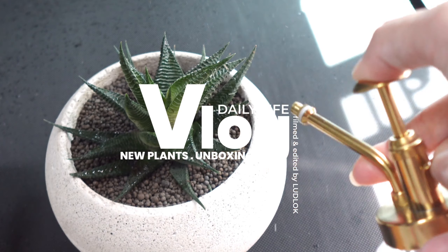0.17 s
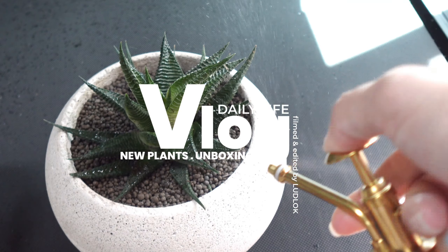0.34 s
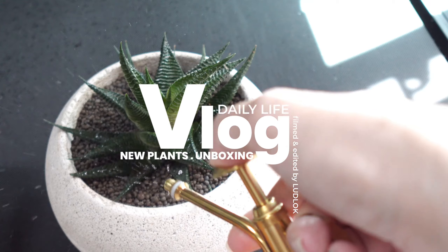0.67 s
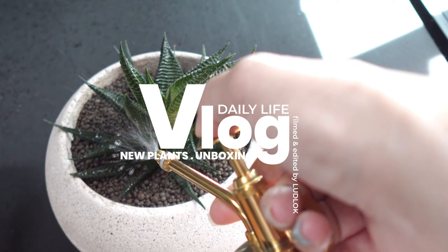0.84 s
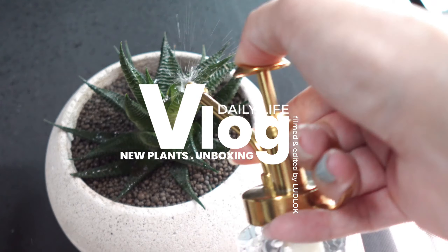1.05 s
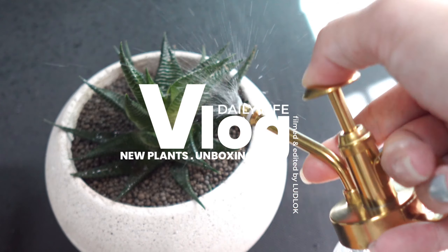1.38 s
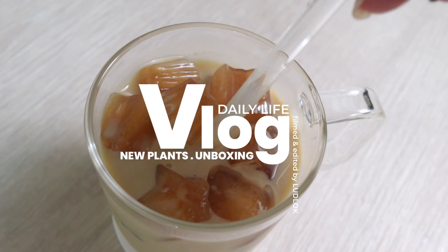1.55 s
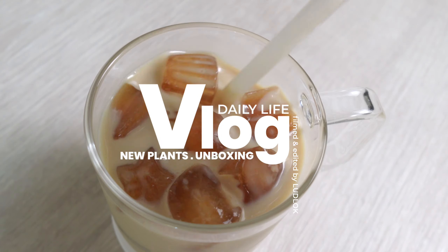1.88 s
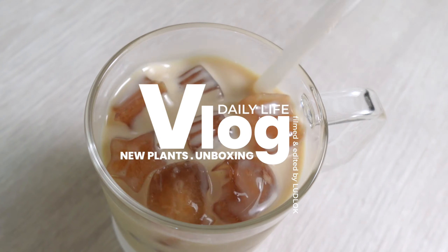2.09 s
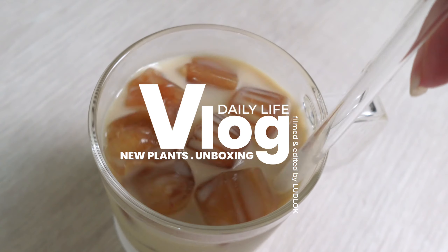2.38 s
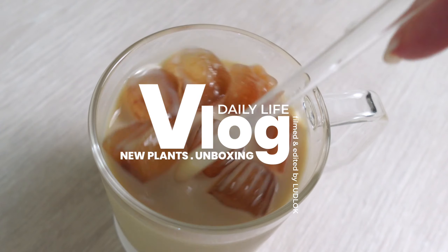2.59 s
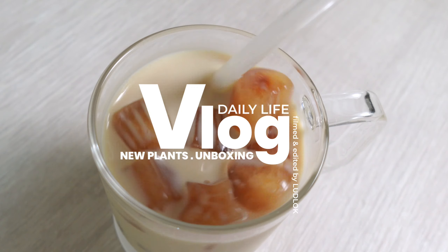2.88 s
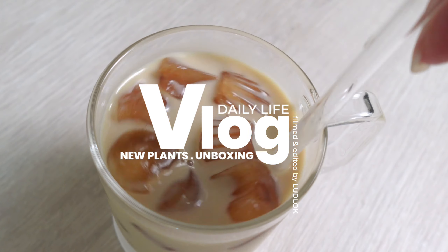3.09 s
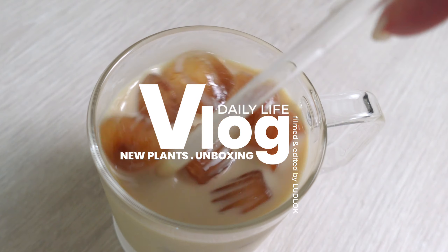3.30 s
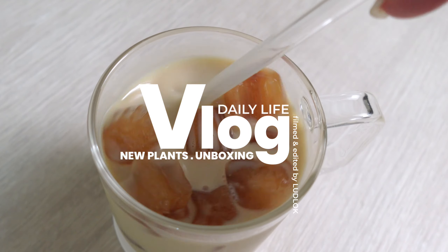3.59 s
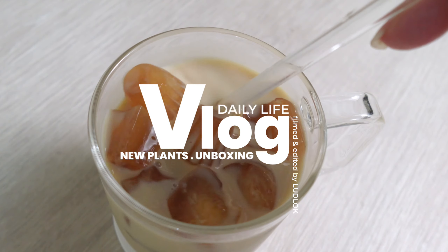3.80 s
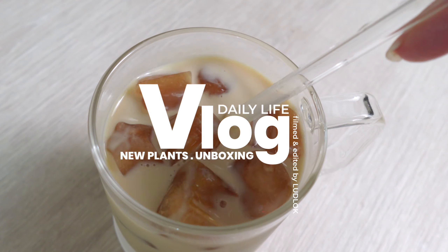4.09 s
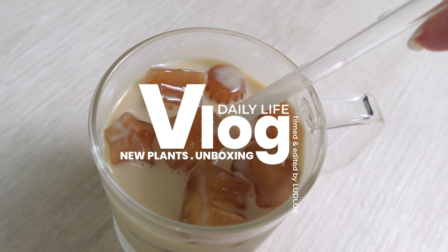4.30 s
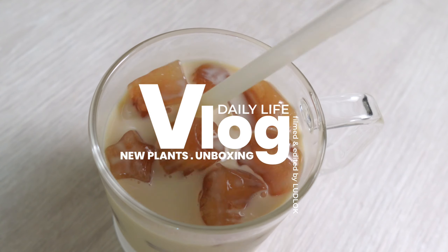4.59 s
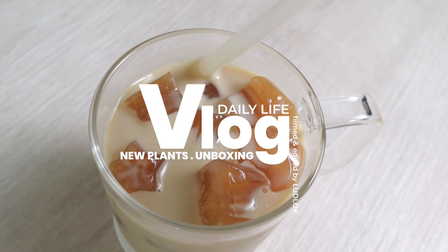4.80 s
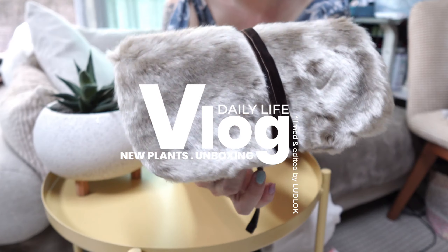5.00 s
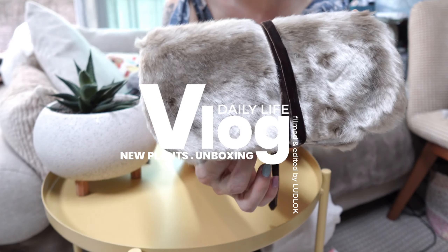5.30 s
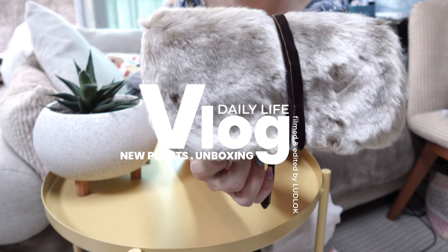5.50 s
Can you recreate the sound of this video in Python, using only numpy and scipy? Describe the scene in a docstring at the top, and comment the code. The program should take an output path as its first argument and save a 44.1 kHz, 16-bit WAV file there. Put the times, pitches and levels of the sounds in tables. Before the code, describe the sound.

Starting abruptly, a metal plant sprayer is pumped quickly: plunger knock, bright spit, fine mist, springy return, repeated about every third of a second. A hard cut brings damped, bright ice clinks against a mug, flurried then sparser, over watery swirl and tiny ticks. The last second is slightly fuller room air with barely audible gliding squeaks, stopping without a long fade. Close stereo microphone, small dry room.

```python
"""Three short indoor scenes; the first opens at full level and the last stops without a fade.
A brass plant mister sprays six times: noise knocks for the plunger, shaped noise for the mist, struck modes for the brass.
A straw stirs iced coffee: cubes clink as damped glass modes, ticks and noise make the rubbing and swirl,
and dying tones make the bubbles. Last, a furry bag: only room tone and a few faint, thin squeaks of gliding narrow noise."""
import sys
import numpy as np
from scipy import signal
from scipy.fft import rfft, irfft, next_fast_len
from scipy.io import wavfile
from scipy.ndimage import map_coordinates

SR = 44100
rng = np.random.default_rng(int(sys.argv[2]) if len(sys.argv) > 2 else 0)


def generate_wav(signal):
    """Clip the signal to [-1, 1] and save it as 16-bit WAV at the path in sys.argv[1]."""
    frames = np.transpose(np.atleast_2d(signal))
    scaled = np.clip(frames, -1, 1) * 32767
    pcm = np.round(scaled).astype(np.int16)
    wavfile.write(sys.argv[1], SR, pcm)


N = 249158

# colour of a knock on the mister: freq_hz, level_db
KNOCK_SPECTRUM = [(300, -29), (900, -9.5), (1500, -2), (2500, -2.5), (4200, -2), (6500, -3.5), (8500, -5.5),
                  (12000, -7), (16000, -15.5)]
# how briskly the straw stirs: time_s, vigour_db
STIR_VIGOUR = [(1.65, -7.5), (1.92, 6.5), (2.1, -4.5), (2.24, 14.5), (2.37, 5.5), (2.46, 4.5), (2.62, -3),
               (2.73, 4.5), (2.82, 1), (2.95, 4), (3.16, -3), (3.38, -7.5), (3.62, 0), (3.74, 3),
               (3.96, 7.5), (4.1, -4.5), (4.46, -8.5), (4.63, 2), (4.8, -9.5)]
# usual left-right likeness of noise: freq_hz, likeness (0 to 1)
ALIKE = [(25, 0.33), (100, 0.94), (1000, 0.94), (14000, 1)]


def amp(db):
    """Decibels to gain."""
    return 10 ** (np.asarray(db) / 20)


def unit(x):
    """Scale to rms 1."""
    return x / np.sqrt(np.mean(x ** 2) + 1e-20)


def blow(x):
    """Scale a hit to the energy of one millisecond at level 1."""
    return x / np.sqrt(np.sum(x ** 2) * 1000 / SR + 1e-20)


def along(points, hz):
    """Read (Hz, value) points on a log axis."""
    f, v = np.transpose(points)
    return np.interp(np.log(hz + 1), np.log(f + 1), v)


def curves(rows):
    """One value per sample for each column after the time."""
    s, *cols = np.transpose(rows)
    return [np.interp(np.arange(N) / SR, s, c) for c in cols]


def wobble(rate):
    """A smooth random curve, rate knots a second."""
    knots = rng.standard_normal(int(N * rate / SR) + 4)
    return map_coordinates(knots, [np.arange(N) * rate / SR])


def filtered(x, response):
    """x times a response of frequency."""
    m = next_fast_len(x.shape[-1] + 8192, True)
    spectrum = rfft(x, m) * response(np.fft.rfftfreq(m, 1 / SR))
    return irfft(spectrum, m)[..., :x.shape[-1]]


def coloured(hit, points):
    """Causal (minimum-phase) colouring of a short hit by (Hz, dB) points."""
    m = 2 * len(hit)
    cepstrum = irfft(np.log(amp(along(points, np.fft.rfftfreq(m, 1 / SR)))))
    cepstrum[1:m // 2] *= 2
    cepstrum[m // 2 + 1:] = 0
    return irfft(rfft(hit, m) * np.exp(rfft(cepstrum)))[:len(hit)]


def decay(t60, size=8192):
    """A level that falls 60 dB in t60 seconds."""
    return np.exp(-np.log(1000) * np.arange(size) / SR / max(t60, 1 / SR))


def burst(t60, size=8192):
    """A dying puff of noise."""
    return blow(rng.standard_normal(size) * decay(t60, size))


def ring(modes, length=1, scatter_db=2, detune=0, size=8192):
    """Damped modes, struck with new strengths, signs and detunings each time."""
    t = np.arange(size) / SR
    total = np.zeros(size)
    for hz, db, t60 in modes:
        strength, shift, sign = rng.standard_normal(3)
        tone = np.sin(2 * np.pi * hz * (1 + detune * shift) * t)
        total += np.sign(sign) * amp(db + scatter_db * strength) * decay(t60 * length, size) * tone
    return blow(total)


def add(track, s, sound):
    """Mix a sound into a track at s seconds, or at the start if s is negative."""
    part = track[max(round(s * SR), 0):][:len(sound)]
    part += sound[:len(part)]


def rush(spectrum, alike=ALIKE):
    """Partly correlated stereo noise of rms 1, from shared mid and opposed side noise."""
    def response(hz):
        turn = np.arccos(np.clip(along(alike, hz), -1, 1)) / 2
        return amp(along(spectrum, hz)) * [np.cos(turn), np.sin(turn)]
    mid, side = filtered(rng.standard_normal((2, N)), response)
    return unit(np.array([mid + side, mid - side]))


def narrow(centre_hz, width_hz):
    """Noise in one resonance, whose centre may move."""
    slow = filtered(rng.standard_normal((2, N)), lambda hz: 1 / (1 + (hz / width_hz) ** 2))
    phase = 2 * np.pi * np.cumsum(centre_hz * np.ones(N)) / SR
    return unit(slow[0] * np.cos(phase) + slow[1] * np.sin(phase))


def grains(rate, spread_db):
    """Random tiny impulses of uneven size, about rate a second, rms 1."""
    size = amp(spread_db * np.minimum(rng.exponential(size=N), 2)) * rng.choice([-1, 1], N)
    return unit(size * (rng.random(N) < rate / SR))


def in_room(x, wet_db, pan_db, gap=0.0011):
    """The direct sound and a diffuse noise tail, most of it shared by both channels."""
    # reverberation: freq_hz, t60_s
    room = [(200, 0.75), (2000, 0.26), (7000, 0.12), (15000, 0.37)]
    hz, t, z = signal.stft(rng.standard_normal((2, SR // 2)), SR, nperseg=256)
    fade = np.exp(-np.log(1000) * t / along(room, hz)[:, None])
    mid, side = signal.istft(z * fade, SR, nperseg=256)[1]
    onset = 1 - np.exp(-np.arange(len(mid)) / SR / gap)
    tail = np.array([mid + 0.2 * side, mid - 0.12 * side]) * onset
    wet = signal.fftconvolve(x[None], tail / np.linalg.norm(tail[0]), axes=1)[:, :N]
    return x * amp([[pan_db / 2], [-pan_db / 2]]) + amp(wet_db) * wet


def mister():
    """Each stroke: touch, press, spit and mist, the valve shuts, release, and the spring rings the brass."""
    # the thumb lets go and the plunger knocks loose: time_s, level_db, treble_db
    releases = [(0.1443, -18, 1), (0.4492, -19.5, 4), (0.7446, -15.5, -5), (1.0103, -18.5, 1),
                (1.2738, -17.5, 4.5)]
    # the spring throws the plunger back, the hand damps the brass: time_s, level_db, ring_length_factor, low_modes_db
    returns = [(.169, -24.5, 0.76, -3), (.485, -32, 1, 9), (0.77, -36, .74, 3), (1.033, -22.5, 0.77, -5),
               (1.299, -21, 0.61, -1)]
    # the thumb takes up the slack, then pushes: time_s, level_db, first_touch_lead_s
    presses = [(0.2646, -19, 0.02), (0.5637, -25.5, 0.021), (.841, -19.5, 0.0082), (1.0988, -18.5, 0.0078),
               (1.3957, -19.5, 0.011)]
    # the valve shuts after a spray: time_s, level_db
    valve = [(0.0466, -22), (0.34, -25.5), (0.5972, -24), (0.9292, -27), (1.185, -21.5)]
    # each push spits, then sprays: time_s, spit_db, spray_s, hiss_db
    puffs = [(-.024, -24, .15, -43.5), (0.2865, -17.5, .155, -45.5), (.5957, -23.5, 0.13, -44),
             (0.8627, -20, .12, -48), (1.1228, -12, 0.13, -48), (1.421, -21.5, .39, -46.5)]
    # brass body modes before hand damping: freq_hz, level_db, t60_s
    brass = [(1445, -7, 0.097), (3306, -13, 0.52), (5356, -12, 0.072), (6150, -7, 0.14), (6955, -13, .11),
             (7260, 2, 0.13), (7520, -5, 0.065), (8860, -12, 0.18), (14180, -19, .06)]
    # nozzle modes: freq_hz, level_db, t60_s
    nozzle = [(6050, 1, 0.06), (6440, -13, 0.046), (6860, 2, 0.039), (9740, 1, 0.02), (10400, 2, 0.02),
              (11700, 0, 0.023), (12800, -5, 0.025)]
    # mist: freq_hz, level_db
    spray = [(300, -8), (1400, -3.5), (3000, 0.5), (6500, 0.5), (8000, 1.5), (13000, -1.5), (16000, -0.5)]
    rebound_s, rebound_db = 0.011, -8  # it knocks once more, duller
    touch_db, return_knock_db = -5, -23
    hiss_lead_s = 0.0032  # mist escapes just before the spit
    sputter_db, sputter_treble_db = -8, 5  # air sputters ahead of the water
    usual_spit_db, treble_per_spit_db = -18.5, 0.82  # stronger spits are brighter

    metal, flow = np.zeros(N), np.zeros(N)
    for s, db, treble_db in releases:
        add(metal, s + 0.000775, amp(db) * knock("release", treble_db))
        add(metal, s + rebound_s, amp(db + rebound_db) * knock("rebound"))
    for s, db, length, low_db in returns:
        held = [(hz, level + low_db * (hz < 4000), t60) for hz, level, t60 in brass]
        ringing = amp(db - 0.5) * ring(held, length=length, scatter_db=5.0)
        add(metal, s + 0.00078, ringing + amp(return_knock_db) * knock("return"))
    for s, db, lead in presses:
        add(metal, s - lead, amp(db + touch_db) * knock("touch"))
        add(metal, s + .0008, amp(db) * knock("press"))
    for s, db in valve:
        puff = blow(coloured(burst(0.046), KNOCK_SPECTRUM))
        add(metal, s + 0.0011, amp(db - 4) * (ring(nozzle, detune=0.0098) + amp(-19) * puff))
    for s, spit_db, length, hiss_db in puffs:
        treble_db = treble_per_spit_db * (spit_db - usual_spit_db)
        add(metal, s + .0008, amp(spit_db) * knock("spit", treble_db))
        add(metal, s - hiss_lead_s, amp(spit_db + sputter_db) * knock("spit", sputter_treble_db))
        # the pressure rises fast, then sags as the plunger bottoms out
        stroke = (np.arange(N) / SR - s + hiss_lead_s) / length
        flow += amp(hiss_db) * np.clip(stroke / 0.056, 0, 1) * (1 - np.clip(stroke, 0, 1) ** 4)
    mist = flow * amp(1.1 * wobble(61.5)) * rush(spray)
    return in_room(metal, wet_db=-12.5, pan_db=-2.0) + mist


def knock(kind, treble_db=0):
    """A dry knock of the plunger in the barrel: coloured noise over hand-damped brass modes."""
    # kinds of knock: low_band_db, high_band_db, t60_s
    kinds = {"release": (-6, -1.5, 0.036), "rebound": (7.3, -26, 0.065), "return": (-7, -4, 0.031),
             "touch": (-23, -32, 0.047), "press": (-5.5, -23, 0.036), "spit": (-2.9, -0.71, 0.034)}
    # brass modes that every knock wakes: freq_hz, level_db, t60_s
    barrel = [(1440, -7, 0.23), (3380, -3, 0.22), (7230, 0.5, 0.15)]
    low_db, high_db, t60 = kinds[kind]
    hit = coloured(blow(burst(0.0021) + amp(8.0) * burst(t60)), KNOCK_SPECTRUM)
    hit = coloured(hit, [(1800, low_db), (4500, 0), (7000, 0), (11000, high_db + treble_db)])
    return amp(-5.5) * blow(hit) + amp(-19) * ring(barrel, scatter_db=2.0)


def clinks():
    """Cubes strike the mug and the rim sings on; returns what both ports share and where they differ."""
    # a cube hits the mug: time_s, level_db, hardness_db (as treble)
    ice = [(1.6388, -14.5, -6), (1.7439, -21.5, 4), (1.8283, -14, -9), (1.8489, -14.5, 4), (1.9003, -1, -7),
           (1.9735, -1.5, 7), (2.0046, -3.5, 7), (2.0175, -5, 8.5), (2.091, -17, 6), (2.1102, -17.5, 2),
           (2.1393, -6, -1.5), (2.144, -11, 0), (2.1539, -14, -1), (2.1836, -1, 4), (2.2042, -3, -3.5),
           (2.2338, -9.5, -4), (2.2535, -16, -11), (2.2752, -2, 4.5), (2.3117, -9, -5), (2.376, -21, -15.5),
           (2.406, -18, -12.5), (2.4339, -3, -8), (2.46, -3.5, 9), (2.4737, -11, -1), (2.4768, 0.5, 3.5),
           (2.4994, -10, -4), (2.5425, -14.5, -3), (2.5557, -11.5, -4), (2.6259, -12.5, -8.5),
           (2.6657, -21, -13), (2.7104, -15.5, -20), (2.8888, -20, -11), (2.8958, -16.5, -14),
           (2.9172, -18, -2), (2.937, -2.5, 6.5), (3.0278, -5.5, 3), (3.052, -16, -12), (3.2142, -11, -12),
           (3.238, -11.5, 1), (3.45, -19.5, -10), (3.5508, -18.5, -15), (3.6816, -3.5, -0.5),
           (3.731, -10, -6.5), (3.7375, -2.5, -10), (3.7617, -10, -3.5), (3.7916, -15.5, -4),
           (3.812, -15, -4), (3.8668, -3.5, -2), (3.885, -18, -3), (3.9026, -7.5, -9), (3.944, -12, -1.5),
           (3.953, -16.5, -7), (3.9815, -14.5, -5), (4.0054, -21.5, 0), (4.203, -26.5, -10),
           (4.5433, -16, -3.5), (4.5593, -15, -2), (4.6054, -5, -11), (4.619, -12, -13.5),
           (4.648, -13.5, -2.5), (4.671, -5, -4), (4.7066, -6.5, -3.5), (4.775, -8, 6), (4.792, -9.5, 2.5)]
    # drink height on the wall shifts the main mode and damps the low ones: time_s, main_mode_hz, low_modes_db
    slosh = [(1.9, 6330, 4.5), (1.975, 6560, -7), (2.14, 6540, 4), (2.25, 6090, -3.5), (2.9, 6230, 2),
             (3.2, 6070, -3), (3.7, 6215, -6), (4.6, 6220, 5), (4.67, 6710, 6.5), (4.78, 6680, -2.5)]
    # the dry rim: freq_hz, level_db, t60_s
    rim = [(2160, -5, 0.2), (4436, 4.5, 0.14), (6350, 2.5, .17), (6700, -9.5, 0.089), (8050, 2.5, 0.1),
           (9640, -5.5, 0.12), (10200, -2, 0.11), (13700, -5.5, .14)]
    # the small wall radiates little bass: freq_hz, level_db
    body_cut = [(150, -5.5), (1300, -4)]
    mug_hz = 6400  # main mode at pitch factor 1
    base_blunt_db, blunt_per_db, blunt_per_hardness = -8.5, 0.75, 0.15
    base_rim_db, rim_per_hardness, rim_db_per_hz = -21, 0.9, 0.0208  # freer rim as the drink sinks
    chatter_db, chatter_per_hardness, chatter_db_per_s = -12, 0.32, 748.5  # blunt contacts skid more
    hit_pan_db = 0.54  # cubes strike around the wall

    glass, side = np.zeros(N), np.zeros(N)
    when, main_hz, low_db = np.transpose(slosh)
    for s, db, hard_db in ice + nudges(count=24):
        pitch = np.interp(s, when, main_hz) / mug_hz
        free_db = np.interp(s, when, low_db)
        # hard contacts are bright; weak, blunt ones favour the low modes
        blunt_db = base_blunt_db + free_db - blunt_per_db * db - blunt_per_hardness * hard_db
        colour = body_cut + [(2100, blunt_db + 3.0), (2800, blunt_db), (3800, 0), (6800, 0), (9000, hard_db)]

        def strike():
            return amp(db - 5.0) * blow(coloured(contact(pitch), colour))

        hit, start = strike(), s + .0007
        add(glass, start, hit)
        rim_db = base_rim_db + rim_per_hardness * hard_db + rim_db_per_hz * mug_hz * (pitch - 1)
        add(glass, start, amp(db + rim_db) * ring(rim, scatter_db=1.5, detune=0.0023))
        # the wall radiates each mode unevenly toward the two ports
        pan = amp(hit_pan_db * rng.standard_normal() / 2) - 1
        add(side, start, amp(-23.0) * strike() + pan * hit)
        # the wet cube skids and touches again, later touches lighter
        skid = strike()
        for lag in rng.uniform(.002, .016, size=4):
            skid_db = chatter_db - chatter_per_hardness * hard_db - chatter_db_per_s * lag
            add(glass, start + lag, amp(skid_db) * skid)
    return glass, side


def contact(pitch):
    """One touch of ice on glass: a crack, and wall modes that the drink damps within milliseconds."""
    # filled mug before pitch shift and shortening: freq_hz, level_db, t60_s
    mug = [(2095, -10.5, 0.029), (2388, -6, 0.02), (2625, -7.5, 0.043), (3246, -2, 0.012),
           (4115, -1.5, 0.025), (4440, 2, 0.017), (5390, -10.5, 0.032), (6320, 0.5, 0.018),
           (6700, 0, 0.015), (8400, -3, 0.013), (10075, -0.5, 0.017), (11660, -13.5, 0.012),
           (13140, -2, 0.0073), (14900, -28, .012)]
    # the instant of contact: freq_hz, level_db
    crack_spectrum = [(40, -58), (300, -27.5), (1400, -7.5), (2500, 4), (5000, 7.5), (10000, -6.5),
                      (16000, -15)]
    modes = [(hz * pitch if hz > 3000 else hz, db, t60) for hz, db, t60 in mug]  # the lowest keep their pitch
    wall = ring(modes, length=0.77, scatter_db=3.5, detune=0.02, size=4096)
    crack = blow(coloured(burst(0.0069, size=4096), crack_spectrum))
    return blow(wall + amp(-8.0) * crack)


def nudges(count):
    """Light contacts at chance moments, stronger with brisk stirring: time_s, level_db, hardness_db."""
    # span of the light contacts: start_s, end_s
    start, end = (1.85, 4.8)
    base_db, db_per_vigour_db, scatter_db, hardness_db = -23, 0.67, 1, -8
    times = start + (end - start) * (np.arange(count) + rng.random(count)) / count
    vigour_db = np.interp(times, *np.transpose(STIR_VIGOUR))
    levels = base_db + db_per_vigour_db * vigour_db + scatter_db * rng.standard_normal(count)
    return [(s, level, hardness_db) for s, level in zip(times, levels)]


def stirring():
    """Cubes clink, rub and tick, the drink swirls and bubbles, the mug nudges the table."""
    # faintest contacts: freq_hz, level_db
    light_touch = [(40, -27.5), (1400, -21), (2400, 8.5), (4200, 1.5), (6500, -5.5), (10000, -3.5),
                   (16000, -15)]
    # ice rubbing: freq_hz, level_db
    rub_spectrum = [(40, -46), (300, -19.5), (1400, 0.5), (2350, 7), (3300, 5.5), (4100, -5), (5000, 0),
                    (6300, -7), (7700, -9), (9700, -21.5), (12800, -28), (16000, -38)]
    # air in the mug: freq_hz, level_db
    swirl_spectrum = [(300, -20.5), (560, -11), (680, -7.5), (780, -0.5), (900, -1.5), (1050, -11),
                      (1400, -15), (2200, -14.5), (4000, -35)]
    # bubbles: time_s, pitch_hz, level_db, t60_s
    bubbles = [(2.277, 789, -32.5, 0.12), (2.47, 736, -33, 0.12), (2.712, 813, -25.5, 0.094),
               (3.912, 804, -26.5, 0.062)]
    # the mug nudges the table: time_s, level_db, t60_s
    bumps = [(2.235, -21, 0.19), (2.252, -41, 0.11), (2.72, -29, 0.34), (4.66, -28.5, 0.23)]
    # table thud: freq_hz, level_db
    table = [(25, -56), (60, -34), (120, -0.5), (220, -0.5), (360, 1), (480, -7), (900, -19), (3000, -48)]
    # mug at the two microphone ports: freq_hz, left_minus_right_db
    port_level = [(60, -3), (110, -0.5), (200, 2.5), (380, -0.5), (700, 0), (1290, 5), (2380, 0),
                  (4400, -1.5), (8120, 0), (15000, 2)]
    # mug at the two microphone ports: freq_hz, left_lead_rad
    port_phase = [(3500, 0.12), (5200, 0.23), (7000, 0.3), (8300, 0.1), (9300, 0.38), (10600, 0.26),
                  (12500, .15), (15000, 0.25)]
    tick_db, rub_db, swirl_db = -43.5, -51.5, -43.5  # at vigour 0
    swirl_per_vigour = 0.61  # the drink follows the vigour more gently

    vigour_db, = curves(STIR_VIGOUR)
    ticks = np.zeros(N)
    for pitch in rng.uniform(.86, 1.12, size=8):  # eight cubes, each with its own voice
        ticks += signal.fftconvolve(grains(rate=16, spread_db=5.5), contact(pitch))[:N]
    ticks = unit(filtered(ticks, lambda hz: amp(along(light_touch, hz))))
    ticking = amp(tick_db + vigour_db) * ticks
    rubbing = amp(rub_db + vigour_db + 4.2 * wobble(90)) * rush(rub_spectrum)[0]
    swirl = amp(swirl_db + swirl_per_vigour * vigour_db + 1.82 * wobble(35)) * rush(swirl_spectrum)

    low = np.zeros(N)
    for s, hz, db, t60 in bubbles:
        life = decay(t60) * (1 - decay(0.021))
        tone = np.sin(2 * np.pi * hz * np.arange(len(life)) / SR)
        add(low, s, amp(db) * life / life.max() * tone)
    for s, db, t60 in bumps:
        thud = coloured(burst(t60), table)
        add(low, s, amp(db) * thud / np.abs(thud).max())

    glass, side = clinks()
    heard = in_room(glass + ticking + rubbing + low, wet_db=-14.5, pan_db=-1.0) + np.array([side, -side])

    def ports(hz):
        half = np.log(amp(along(port_level, hz))) / 2 + 1j * along(port_phase, hz) / 2
        return np.exp([half, -half])

    return filtered(heard, ports) + swirl


def bag():
    """Thin squeaks, narrow noise gliding up or down, hang briefly in the room."""
    # one glide each: start_s, length_s, level_db, start_hz, end_hz
    glides = [(5.167, 0.081, -51, 2800, 3260), (5.48, 0.053, -52.5, 5450, 6200),
              (5.518, 0.015, -40.5, 5470, 3280), (5.532, .14, -51.5, 4500, 5900)]
    edge = 0.38  # exponent of the swell and fade
    squeaks = np.zeros(N)
    for s, length, db, from_hz, to_hz in glides:
        u = np.clip((np.arange(N) / SR - s) / length, 0, 1)
        swell = (4 * u * (1 - u)) ** edge
        squeaks += amp(db) * swell * narrow(from_hz + (to_hz - from_hz) * u, width_hz=420)
    return in_room(amp(1.8 * wobble(80)) * squeaks, wet_db=4.0, pan_db=5.0)


def shot(index, rise, fall):
    """The level of one scene: squared ramps of rise and fall seconds at its ends."""
    # scene limits: start_s, end_s
    spans = [(-.1, 1.56), (1.58, 4.87), (4.885, 5.9)]
    start, end = spans[index]
    t = np.arange(N) / SR
    return (np.clip((t - start) / rise, 0, 1) * np.clip((end - t) / fall, 0, 1)) ** 2


def scene():
    """The three scenes in turn, each over its own room tone of shaped noise."""
    # room tone around the mister: freq_hz, level_db
    plant_air = [(25, -45), (60, -10), (110, 4.5), (200, 2.5), (400, -5), (1000, 0), (1400, -3), (2200, -8),
                 (4000, -12.5), (6300, -15), (8500, -18), (16000, -21)]
    # room tone around the mug: freq_hz, level_db
    mug_air = [(25, -34.5), (50, -23.5), (110, -3), (190, 2), (260, -0.5), (450, -5.5), (600, -9),
               (800, -1), (1400, -12.5), (2100, -9), (3200, -22.5), (5000, -23.5), (9000, -33),
               (16000, -42.5)]
    # room tone around the bag: freq_hz, level_db
    bag_air = [(15, -55), (25, -30), (108, -1.5), (229, -1.5), (439, -10), (677, -4), (775, -9), (1160, -4),
               (2410, -14.5), (3080, -18), (4370, -25.5), (5570, -25.5), (6050, -27.5), (7920, -34),
               (16000, -40.5)]
    # open room around the plant sounds wider: freq_hz, likeness (0 to 1)
    plant_alike = [(25, .3), (100, 0.97), (250, .68), (700, 0.6), (2400, 0.67), (14000, 1)]
    # open room around the bag sounds wider: freq_hz, likeness (0 to 1)
    bag_alike = [(25, .2), (110, 0.88), (300, 0.86), (2400, 0.75), (8000, 0.57), (15000, .98)]
    # low room resonances around the mug: freq_hz, width_hz, level_db
    resonances = [(196.6, 8.3, -52), (343, 14, -71)]
    plant = mister() + amp(-49) * rush(plant_air, plant_alike)
    hum = sum(amp(db) * narrow(hz, width) for hz, width, db in resonances)
    coffee = stirring() + amp(-43.5) * rush(mug_air) + hum
    coffee = filtered(coffee, lambda hz: hz ** 2 / (hz ** 2 + 45 ** 2))  # the microphone thins the deepest bass
    fur = bag() + amp(-40.5) * rush(bag_air, bag_alike)
    plant = plant * shot(index=0, rise=.05, fall=0.058)
    coffee = coffee * shot(index=1, rise=0.1, fall=0.064)
    return plant + coffee + fur * shot(index=2, rise=.12, fall=.05)


def record(dry):
    """The recorder rounds the tallest peaks and cuts steeply above its band limit."""
    top_hz = 16300
    rounded = dry / (1 + np.abs(dry / .8) ** 6) ** (1 / 6)
    return filtered(rounded, lambda hz: 1 / (1 + (hz / top_hz) ** 80))


dry = scene()
out = record(dry)
generate_wav(out)
```